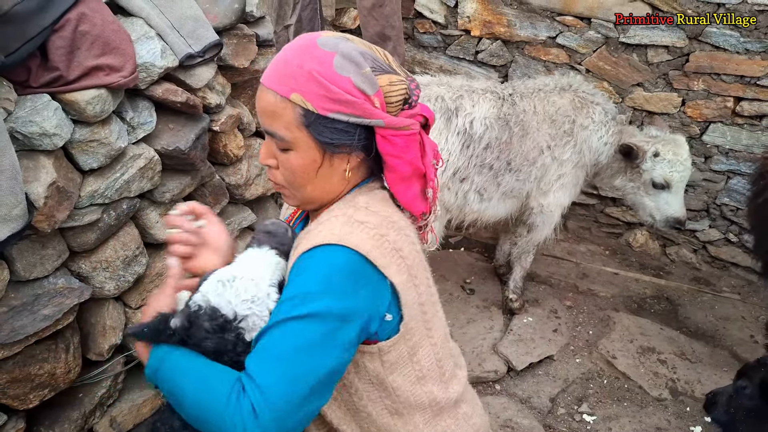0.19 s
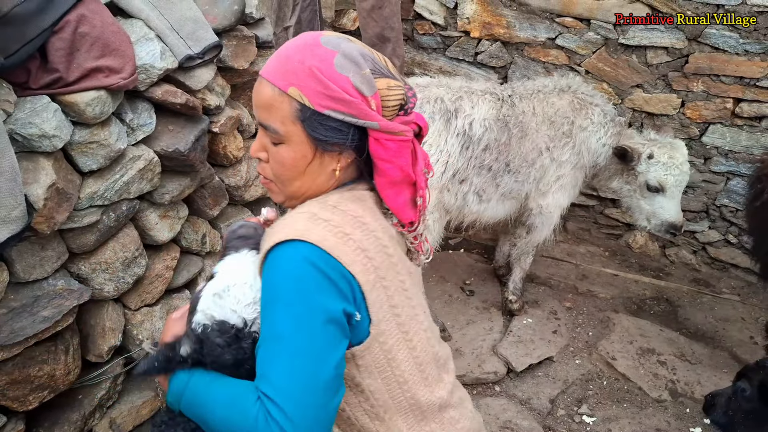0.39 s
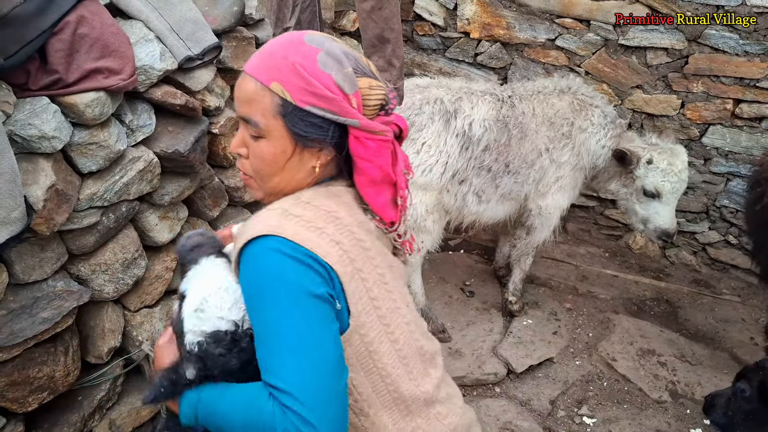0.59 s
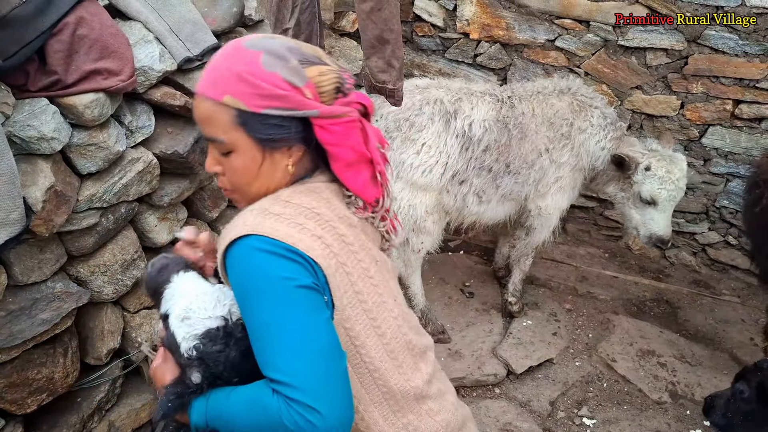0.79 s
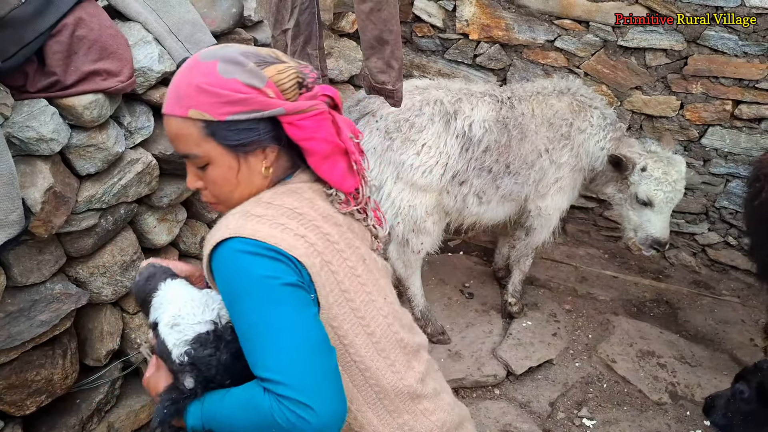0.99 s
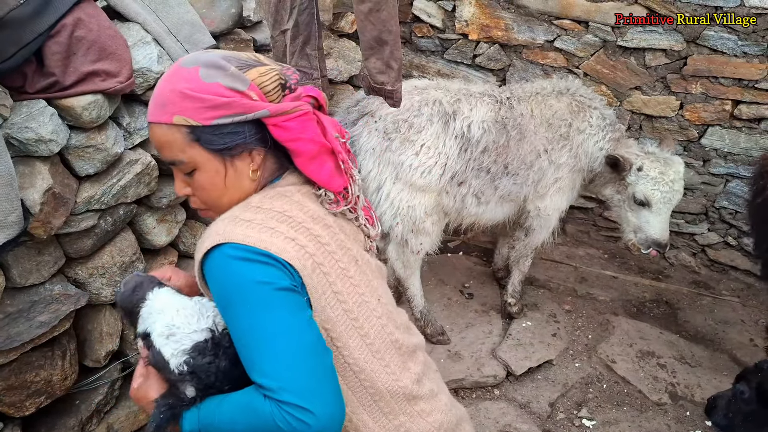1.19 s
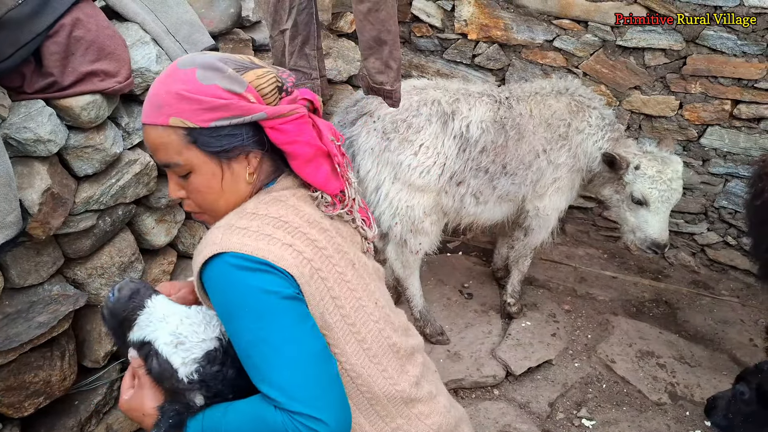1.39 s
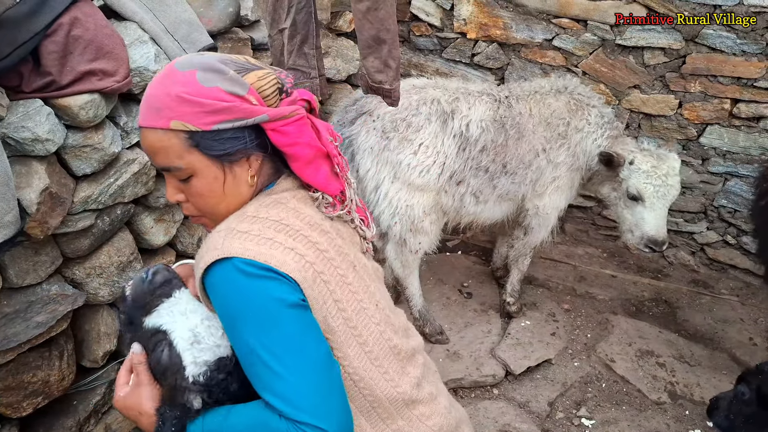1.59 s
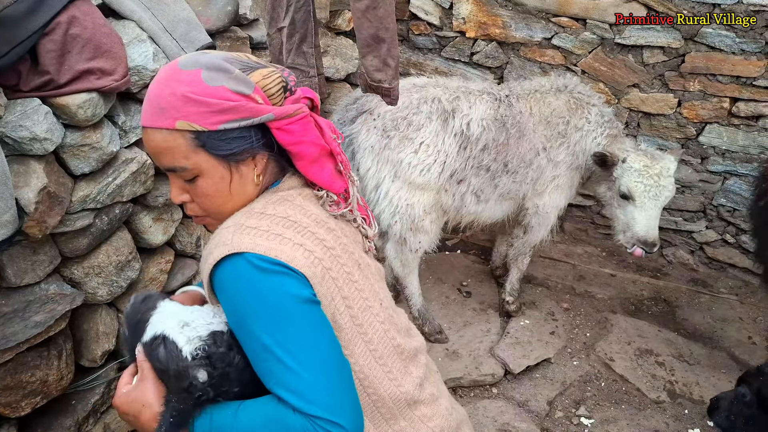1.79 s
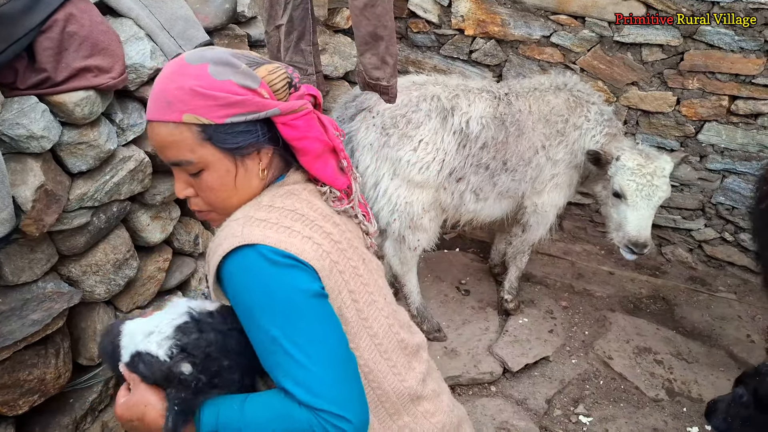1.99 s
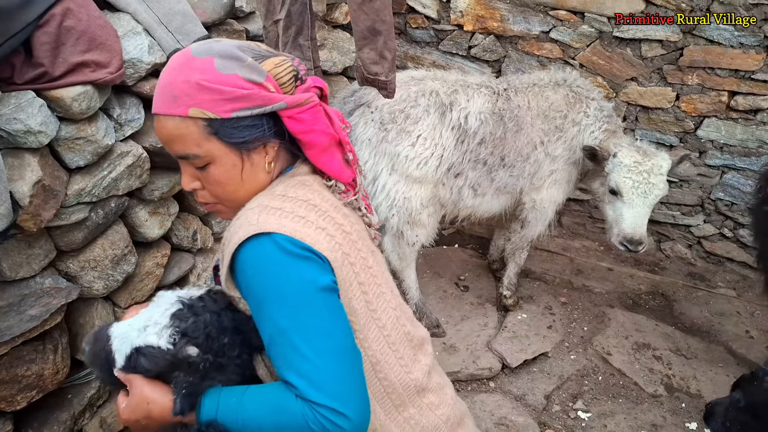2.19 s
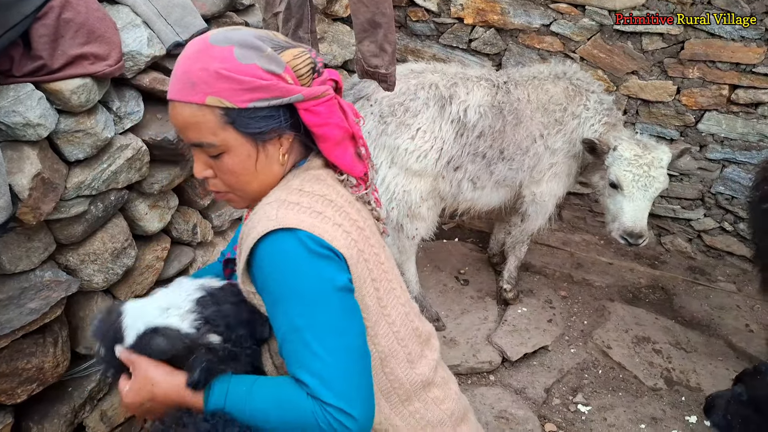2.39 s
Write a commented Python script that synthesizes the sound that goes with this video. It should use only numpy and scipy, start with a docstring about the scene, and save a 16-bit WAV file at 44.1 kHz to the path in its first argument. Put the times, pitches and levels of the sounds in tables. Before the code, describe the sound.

Close by, a young penned animal grunts once, ending in a fluttering blow through the nostrils. Soft rustles of fur and cloth follow, then a brief double scrape on stone, with a low rush and faint hiss throughout.

```python
"""A steady low rush and a faint far hiss fill a stone-walled pen, and cloth and fur rustle softly.
At 0.24 s a young animal close to the microphone gives one snorting grunt: slow, heavy pulses excite
the resonances of chest and throat, then loosen into a fluttering, turbulent blow through the nostrils.
A soft treble tail dies away, a tiny bright tick sounds at 0.54 s, and more rustles follow. Just after
2 s a double scuff on the floor rings a loose stone briefly, and the rush swells a little at the end."""
import sys
import numpy as np
from scipy import signal
from scipy.fft import rfft, irfft, next_fast_len
from scipy.io import wavfile
from scipy.ndimage import map_coordinates

SR = 44100
rng = np.random.default_rng(int(sys.argv[2]) if len(sys.argv) > 2 else 0)


def generate_wav(signal):
    """Clip the signal to [-1, 1] and save it as 16-bit WAV at the path in sys.argv[1]."""
    frames = np.transpose(np.atleast_2d(signal))
    scaled = np.clip(frames, -1, 1) * 32767
    pcm = np.round(scaled).astype(np.int16)
    wavfile.write(sys.argv[1], SR, pcm)


N = 110250

# Resonances of throat and nose: f/Hz, width/Hz, gain for pulses/dB, gain for air/dB, left-right/dB
FORMANTS = [(207.4, 110, 3, -12, -1.5), (476, 144, 3, 9, 2.5), (838, 74, -3, 9, -6),
            (1083, 370, -15.5, 0, 9), (1960, 283, -12, 7, -9), (2134, 310, -25, 3, 4.5),
            (3330, 87, -19.5, -3, 13), (3730, 160, -17.5, -7.5, 5.5), (4390, 97, -12, -7, -0.5),
            (5180, 240, -27, -10, -8), (6400, 2500, -33, -18.5, -6), (7000, 330, -33, -16, 13),
            (12400, 9700, -30, -20, 4.5)]


def amp(db):
    """Amplitude ratio of a level: tenfold for every 20 dB."""
    return 10 ** (np.asarray(db) / 20)


def unit(x):
    """Normalisation to an rms of 1."""
    return x / np.sqrt(np.mean(x ** 2) + 1e-20)


def along(points, hz):
    """Interpolation of (f/Hz, value) points on a logarithmic frequency axis."""
    f, v = np.transpose(points)
    return np.interp(np.log(hz + 1), np.log(f + 1), v)


def curve(points):
    """Linear interpolation of (t/s, value) points, one value per sample."""
    return np.interp(np.arange(N) / SR, *np.transpose(points))


def wobble(rate):
    """Smooth random modulation: a spline through `rate` Gaussian knots a second."""
    knots = rng.standard_normal(int(N * rate / SR) + 4)
    return map_coordinates(knots, [np.arange(N) * rate / SR])


def pan(db):
    """Left and right gains for an interchannel level difference."""
    return amp(np.array([[.5], [-.5]]) * db)


def lead(hz, seconds):
    """Left and right phase factors for a time difference, positive when the left is earlier."""
    return np.exp(1j * np.pi * hz * seconds * np.array([[1], [-1]]))


def filtered(x, response):
    """Linear filtering: the spectrum of x times a complex frequency response."""
    m = next_fast_len(N + SR // 2)
    return irfft(rfft(x, m) * response(np.fft.rfftfreq(m, 1 / SR)), m)[..., :N]


def noise(spectrum, tilt_db=0):
    """Partially coherent stereo noise of rms 1: alike in the bass, unrelated in the treble."""
    # Likeness of left and right: f/Hz, correlation
    coherence = [(60, 1), (250, 0.94), (400, 0.89), (600, 0.6), (850, 0.19), (1400, 0.24), (2200, 0.45),
                 (5000, 0.033), (15000, .05)]
    angle = lambda hz: np.arccos(np.clip(along(coherence, hz), 0, 1)) / 2
    colour = lambda hz: amp(along(spectrum, hz) + tilt_db * np.log2(hz + 1))
    white = rng.standard_normal((2, N))
    mid, side = filtered(white, lambda hz: colour(hz) * [np.cos(angle(hz)), np.sin(angle(hz))])
    return unit(np.array([mid + side, mid - side]))


def ports(x):
    """Spaced reception: two microphone ports hear the pen with differences of time and level."""
    # Time difference: f/Hz, lead of the left/s
    left_lead = [(60, -.0002), (150, 0), (300, .00025), (700, .0003), (1000, .00045), (2200, .00052)]
    # Level difference: f/Hz, left-right/dB
    balance = [(50, 2.8), (200, 0.1), (450, -0.5), (560, -2), (1000, 1), (1550, -2.5), (1900, -4.5),
               (3300, -5.5), (5000, 0), (7000, -2), (9300, 7), (13000, 3.5)]
    return filtered(x, lambda hz: pan(along(balance, hz)) * lead(hz, along(left_lead, hz)))


def background():
    """Amplitude-modulated noise: a low rush wavers under a faint far hiss that slowly grows."""
    # Spectrum of the rush: f/Hz, relative density level/dB
    rush_spectrum = [(12, -61), (20, -43), (75, -4.5), (113, -3), (157, -5.5), (226, -1.5), (302, -6),
                     (441, -6), (537, -14.5), (588, -14.5), (750, -19.5), (980, -26), (1650, -120)]
    # Envelope of the rush: t/s, level/dB
    rush_level = [(0, -33.5), (.75, -33.5), (.9, -36), (.97, -34), (1.21, -34), (1.28, -38.5), (1.4, -34),
                  (1.8, -34), (2.0, -32), (2.32, -33.5), (2.5, -29.5)]
    # Spectrum of the far hiss: f/Hz, relative density level/dB
    hiss_spectrum = [(560, -10.5), (950, -2), (1370, -7), (1840, -8), (2300, -7), (2800, -11), (3380, -15),
                     (4280, -17.5), (6310, -21), (7710, -27), (8670, -25.5), (9990, -34), (14200, -30),
                     (15800, -39)]
    hiss_db, rise_db_per_s = -48.5, 1.15
    from_middle_s = (np.arange(N) - N / 2) / SR
    rush = amp(curve(rush_level) + 0.93 * wobble(9.25)) * noise(rush_spectrum)
    hiss = amp(hiss_db + rise_db_per_s * from_middle_s + 0.98 * wobble(6.08)) * noise(hiss_spectrum)
    return rush + hiss


def rustles_and_tail():
    """Noise under Gaussian envelopes: soft rustles, and a treble tail dying away after the grunt."""
    # Swells: peak t/s, rise/s, fall/s, level/dB, spectral tilt/(dB per octave)
    # The one at 0.47 s is the tail; the others are cloth and fur.
    swells = [(.085, 0.11, 0.18, -52, -1.5), (.47, .05, 0.077, -58.5, 4), (.745, 0.14, 0.049, -55.5, 1),
              (.86, 0.077, 0.057, -51, 1.5), (1.06, 0.023, .04, -64, 14), (1.34, 0.012, 0.017, -60, 7),
              (1.657, 0.066, 0.034, -48, 2), (1.785, 0.081, .05, -58.5, 4), (1.94, 0.12, 0.27, -54.5, -1),
              (2.28, 0.071, .04, -57, -7)]
    # Spectrum before the tilt: f/Hz, relative density level/dB
    swell_spectrum = [(300, -24), (1500, 8), (2500, 3.5), (5000, 3.5), (8000, -4.5), (13000, -7),
                      (16000, -17.5)]
    t = np.arange(N) / SR
    out = np.zeros((2, N))
    for peak_s, rise, fall, db, tilt_db in swells:
        swell = np.exp(-((t - peak_s) / np.where(t < peak_s, rise, fall)) ** 2)
        grainy_hiss = unit(noise(swell_spectrum, tilt_db) * amp(wobble(360)))
        out += amp(db) * swell * grainy_hiss
    return out


def tract(x, gains_db):
    """Formant filtering: throat and nose act as parallel resonances, each a squared band-pass."""
    band = lambda hz, centre, width: 1j * hz * width / (centre ** 2 - hz ** 2 + 1j * hz * width)
    return filtered(x, lambda hz: sum(amp(db) * pan(side_db) * band(hz, centre, width) ** 2
                                      for (centre, width, _, _, side_db), db in zip(FORMANTS, gains_db)))


def grunt():
    """Source and filter: slow pulses ring chest and throat; each lets a gust of air through the nose."""
    # Repetition rate of the pulses: t/s, f/Hz
    pulse_rate = [(.24, 46), (.272, 43), (.3, 48.7), (.312, 59), (.333, 48), (.37, 55), (.43, 51)]
    # Force of the pulses: t/s, relative level/dB
    force = [(.238, -13), (.261, -2.5), (.284, 1.5), (.306, -3.5), (.321, -26), (.343, -12), (.365, -26),
             (.415, -28), (.44, -29), (.46, -54)]
    # Airflow through the nostrils: t/s, relative level/dB
    airflow = [(.19, -78), (.235, -40), (.272, -40), (.288, -32), (.31, -30), (.328, -30.5), (.346, -27.5),
               (.38, -33), (.412, -35), (.44, -48.5), (.48, -67), (.55, -110)]
    # Turbulent hiss of the nostrils: f/Hz, relative density level/dB
    hiss_spectrum = [(1500, -28), (3000, 2), (6000, 8.5), (8000, 8), (11000, 1.5), (14500, 4), (16000, 8)]
    # Blown air buffeting the microphone: f/Hz, relative density level/dB
    puff_spectrum = [(15, -40), (30, -20), (45, 3), (70, 1), (130, -2), (200, -12), (330, -16), (500, -30),
                     (1000, -73)]
    first_pulse_s, rasp_s, gust_s = .2386, 0.015, .003
    chest_hz, chest_t60_s, low_cut_hz, soften_hz = 98.2, 0.069, 42, 2420
    t = np.arange(N) / SR
    convolve = lambda x, shape: signal.fftconvolve(x, shape)[:N]
    force_db, air_db = curve(force), curve(airflow)
    _, _, pulse_gains_db, air_gains_db, _ = np.transpose(FORMANTS)
    cycles = np.cumsum(curve(pulse_rate) * (t >= first_pulse_s) / SR)
    pulses = np.diff(np.ceil(cycles), prepend=0) * (t < force[-1][0])  # one impulse per cycle

    chest_mode = np.sin(2 * np.pi * chest_hz * t) * amp(-60 * t / chest_t60_s)
    chest = convolve(pulses * amp(force_db - 1.5), chest_mode)
    chest = filtered(chest, lambda hz: (hz ** 2 / (hz ** 2 + low_cut_hz ** 2)) ** 2)

    slaps = pulses * amp(1.1 * force_db + 2.5)
    rasp = convolve(slaps, np.exp(-t / rasp_s)) * rng.standard_normal(N)
    excitation = filtered(10 * slaps + 0.31 * rasp, lambda hz: 1 / (1 + 1j * hz / soften_hz))
    throat = tract(excitation, pulse_gains_db)

    gust = t / gust_s * np.exp(1 - t / gust_s)
    flutter_db = 5 * (convolve(pulses, gust) - .5)
    white = noise([(100, 0), (10000, 0)])
    nose = amp(air_db + flutter_db) * unit(tract(white, air_gains_db))

    # The hiss follows the airflow more steeply than the puff does.
    peak_db = air_db.max()
    hiss_db = peak_db - 12 + 1.4 * (air_db - peak_db) + .5 * flutter_db
    puff_db = peak_db + 1 + 0.6 * (air_db - peak_db)
    hiss = amp(hiss_db) * noise(hiss_spectrum) * pan(db=0.5)
    puff = amp(puff_db) * noise(puff_spectrum)
    return ports(chest + hiss + puff) + filtered(throat + nose, lambda hz: lead(hz, seconds=.0003))


def tick():
    """Exponential decay: a few milliseconds of treble noise are heard as one tiny tick."""
    # Spectrum of the tick: f/Hz, relative density level/dB
    tick_spectrum = [(7000, -50), (9500, -18), (11500, 3), (16000, 2)]
    onset_s, level_db, t60_s = .5427, -37, .005
    age = np.arange(N) / SR - onset_s
    return (age > 0) * amp(level_db - 60 * np.abs(age) / t60_s) * noise(tick_spectrum)


def scuffs():
    """Frictional excitation: a short double scrape rings one damped mode of a loose stone."""
    # Scrapes on the stone floor: t/s, level/dB
    strokes = [(2.061, -33.5), (2.083, -44)]
    # Spectrum of a scrape: f/Hz, relative density level/dB
    scrape_spectrum = [(300, -17), (1000, -3), (1500, -4), (1820, -2), (2200, -1), (4300, -5), (8000, -21),
                       (15000, -29)]
    rise_s, scrape_t60_s = 0.0032, 0.096
    stone_hz, stone_t60_s, stone_db = 1810, 0.06, 2.5
    t = np.arange(N) / SR
    out = np.zeros((2, N))
    for onset_s, db in strokes:
        age = np.maximum(t - onset_s, 0)
        scrape = amp(-60 * age / scrape_t60_s) * noise(scrape_spectrum)
        ring = amp(stone_db - 60 * age / stone_t60_s) * np.sin(2 * np.pi * stone_hz * age)
        out += amp(db) * (1 - np.exp(-age / rise_s)) * (scrape + ring)
    return out


def scene():
    """Superposition: the close grunt adds to the small sounds and the background of the pen."""
    return grunt() + ports(rustles_and_tail() + scuffs() + tick() + background())


def record(dry):
    """Band limiting: an ideal low-pass filter passes nothing above its cutoff."""
    cutoff_hz = 15850
    return filtered(dry, lambda hz: hz < cutoff_hz)


dry = scene()
out = record(dry)
generate_wav(out)
```